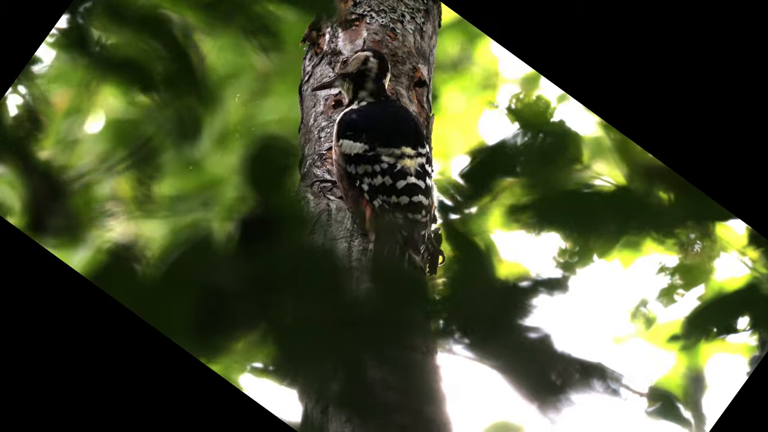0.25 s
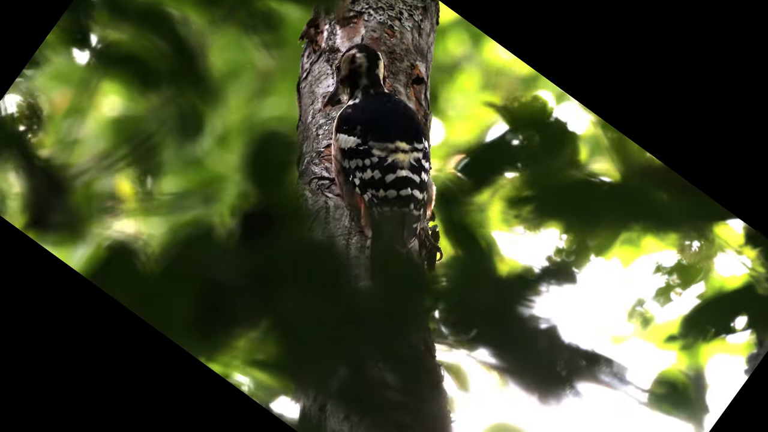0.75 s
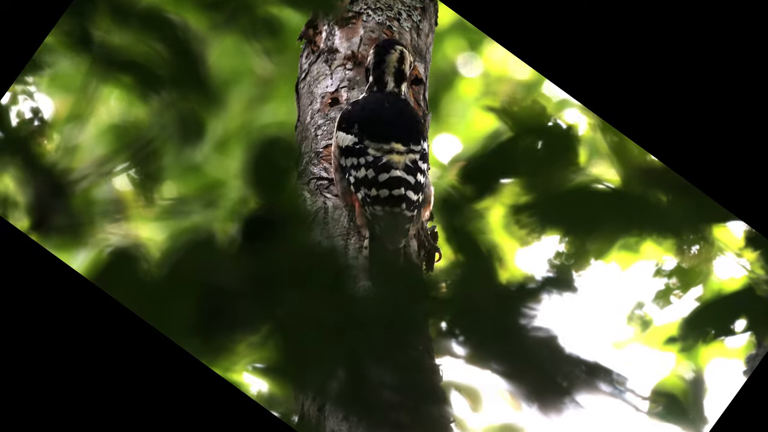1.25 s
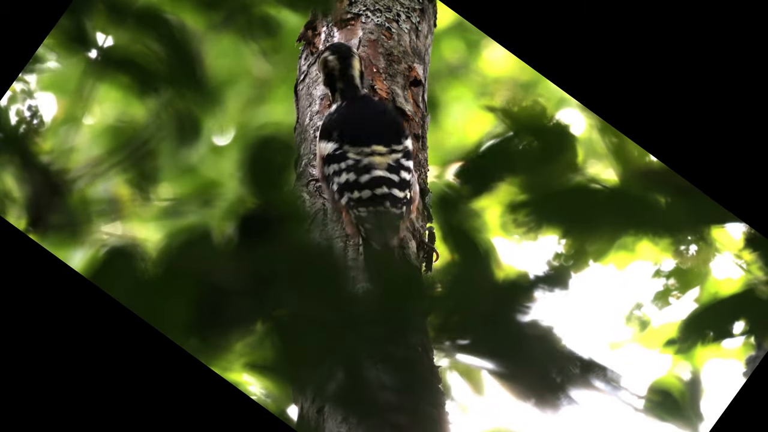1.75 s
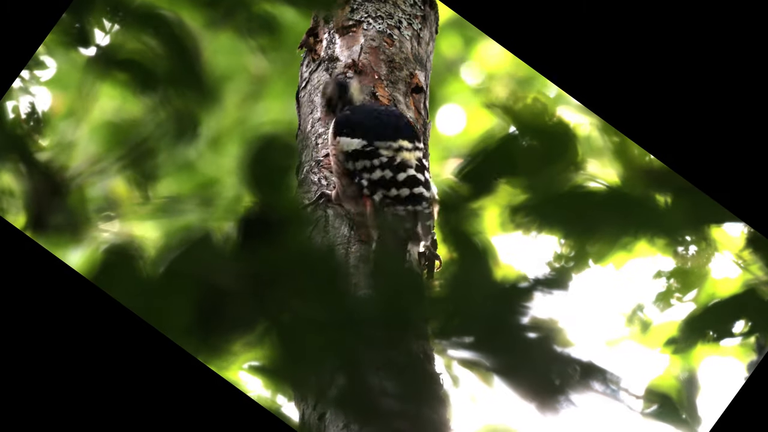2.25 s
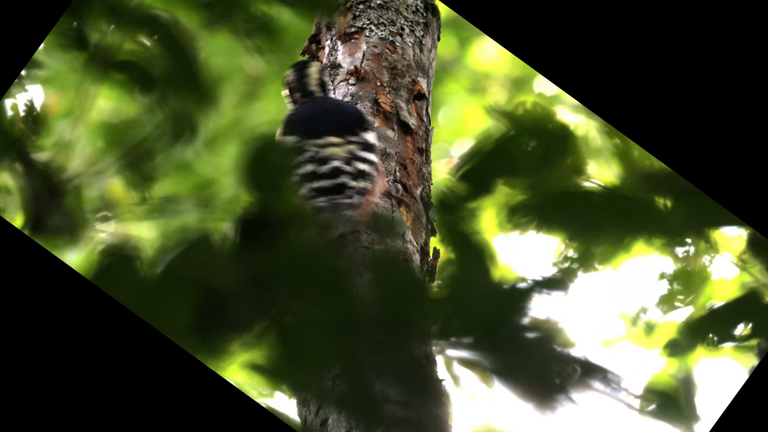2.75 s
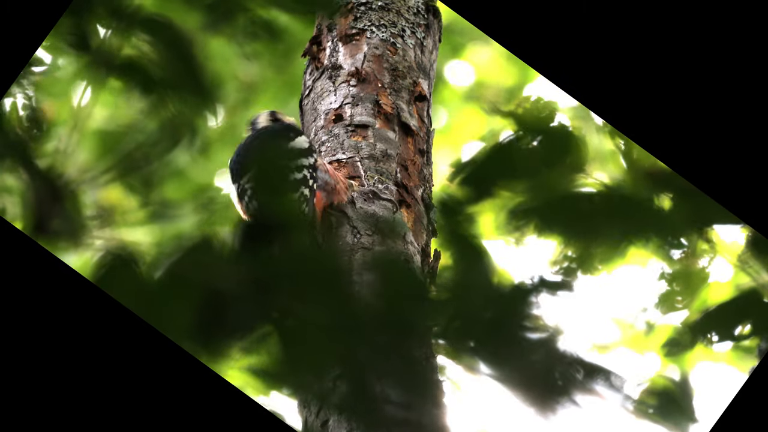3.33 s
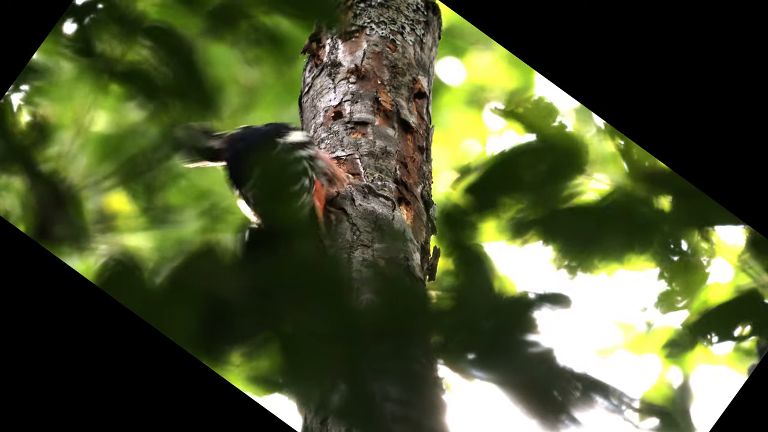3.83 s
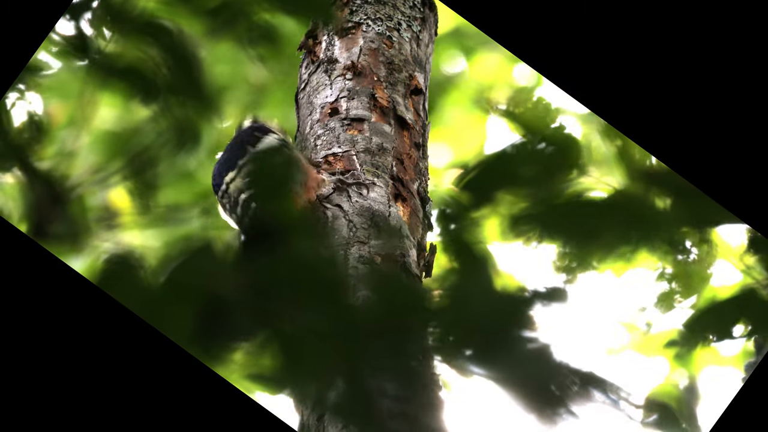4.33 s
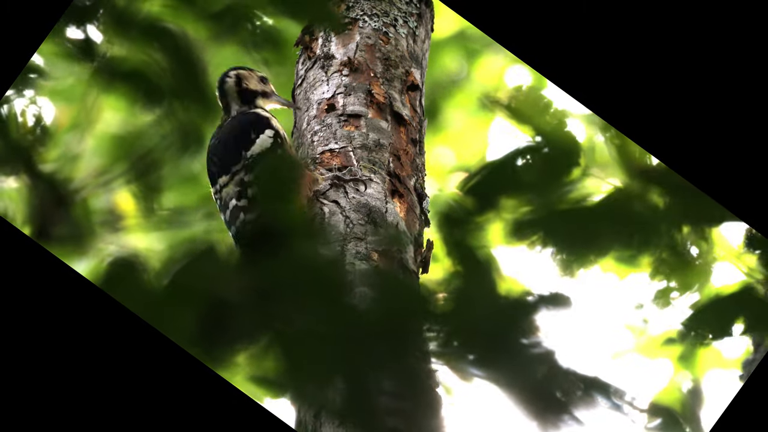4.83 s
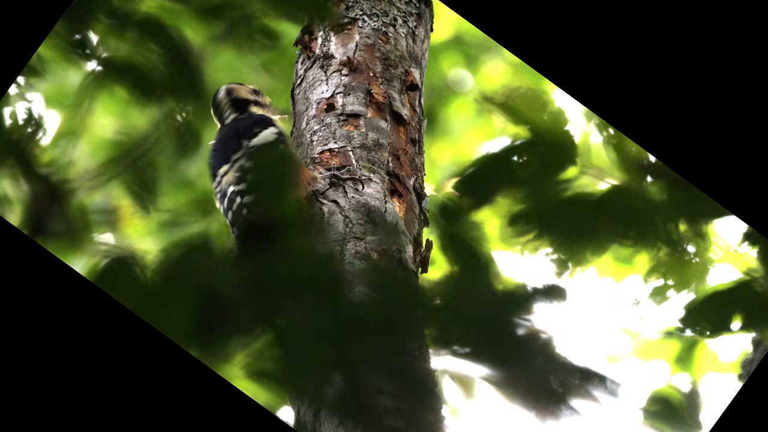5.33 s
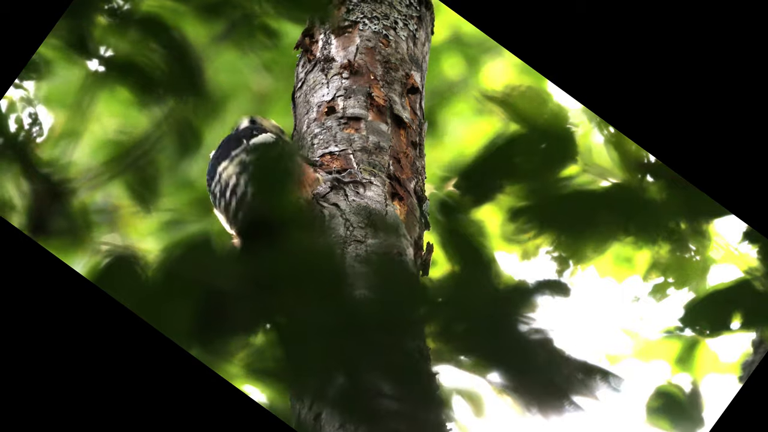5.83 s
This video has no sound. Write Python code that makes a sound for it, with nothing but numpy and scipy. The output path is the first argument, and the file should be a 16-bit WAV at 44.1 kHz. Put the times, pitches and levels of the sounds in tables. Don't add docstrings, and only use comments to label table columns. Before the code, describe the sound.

A woodpecker knocks on a slim trunk in uneven dull thuds, softer at first, then louder and higher, over low forest rumble.

```python
import sys
import numpy as np
from scipy import signal
from scipy.fft import rfft, irfft
from scipy.io import wavfile
from scipy.ndimage import uniform_filter1d

SR = 44100
rng = np.random.default_rng(int(sys.argv[2]) if len(sys.argv) > 2 else 0)


def voltage_ratio(level):
    return 10 ** (np.asarray(level, float) / 20)


def dump(signal):
    limited = np.clip(np.atleast_2d(signal).T, -1, 1)
    pcm = np.round(limited * 32767).astype(np.int16)
    wavfile.write(sys.argv[1], SR, pcm)


N = 268083

# start_s (crest), level_db, first_return_db, second_return_db, pitch_hz
NEAR_BLOWS = [
    (0.6136, -30, -5.5, -7, 226),
    (0.7719, -33, 3.5, -8.5, 234),
    (1.0218, -29.5, -10, -5.5, 235),
    (1.1937, -30, -4, -6.5, 226),
    (1.5132, -33, 5, -1, 228),
    (1.6843, -27, -9, -5.5, 227),
    (1.974, -33.5, -0.5, -5, 215),
    (2.1532, -28, 1, -4, 236.5),
    (2.3428, -27, -5, -4.5, 227),
    (2.552, -28.0, -4.5, -3, 217),
]
# thud_width_hz, return_pitch_ratio, return_width_hz, rebound_db, delays_s (rebound, returns)
NEAR_WOOD = (96, 0.97, 104, -2.5, (.0156, .0230, .0388))
# pitch_hz, width_hz, level_db, delay_s
NEAR_UPPER = (325, 58, -16, .0016)


def near_face():
    return pecks(NEAR_BLOWS, NEAR_WOOD, NEAR_UPPER, lead=3.1)


# start_s (crest), level_db, first_return_db, second_return_db, pitch_hz
SIDE_BLOWS = [
    (3.284, -23, -11, -13.5, 254),
    (3.4599, -21, -6, -19, 264),
    (3.6644, -19.5, -6.5, -15.5, 263.7),
    (4.0569, -20.5, -8, -19, 264),
    (4.5259, -28.5, -6.5, -6, 248),
    (4.6869, -25.5, -5.5, -22.0, 269),
    (4.9412, -21, -6.5, -15.5, 258.3),
    (5.2954, -18.5, -6, -15, 262),
    (5.5741, -33, -14, -3, 249),
    (5.98, -27, -3, -17, 256),
]
# thud_width_hz, return_pitch_ratio, return_width_hz, rebound_db, delays_s (rebound, returns)
SIDE_WOOD = (155, .93, 98, -14.5, (.0148, .0211, .0430))
# pitch_hz, width_hz, level_db, delay_s
SIDE_UPPER = (322, 52, -18, -.0013)


def side_face():
    return pecks(SIDE_BLOWS, SIDE_WOOD, SIDE_UPPER, lead=-.55)


def pecks(blows, wood, upper, lead):
    width_hz, return_ratio, return_width_hz, rebound_db, delays_s = wood
    upper_hz, upper_width_hz, upper_db, upper_delay_s = upper
    wander_s = rng.normal(0, .0002, (len(blows), 3))
    out = np.zeros(N)
    for (start_s, level_db, first_db, second_db, pitch_hz), slip_s in zip(blows, wander_s):
        at = np.arange(round((start_s - .02) * SR), min(round((start_s + .12) * SR), N))
        t = at / SR - start_s
        blow = thud(t, pitch_hz, width_hz, lead)
        blow += voltage_ratio(upper_db) * thud(t - upper_delay_s, upper_hz, upper_width_hz, 0)
        returns_db = (rebound_db, first_db, second_db)
        for delay_s, return_db in zip(delays_s + slip_s, returns_db):
            echo = thud(t - delay_s, pitch_hz * return_ratio, return_width_hz, lead)
            blow += voltage_ratio(return_db) * echo
        out[at] += voltage_ratio(level_db) * blow
    return out


def thud(since_crest_s, pitch_hz, width_hz, lead):
    age = np.maximum(np.pi * width_hz * since_crest_s + 3, 0)
    swell = (age / 3) ** 3 * np.exp(3 - age)
    return swell * np.cos(2 * np.pi * pitch_hz * since_crest_s - lead)


def without_bass(blows):
    gentle = signal.butter(4, 150, "high", fs=SR, output="sos")
    steep = signal.butter(6, 150, "high", fs=SR, output="sos")
    return signal.sosfiltfilt(steep, signal.sosfilt(gentle, blows + 1e-18))


# start_s, peak_db
TICKS = [
    (5.9838, -63),
]


def ticks():
    out, t = np.zeros(N), np.arange(300) / SR
    ring = np.sin(2 * np.pi * 9800 * t) * np.exp(-t / .0015)
    for start_s, peak_db in TICKS:
        out[round(start_s * SR):][:300] = voltage_ratio(peak_db) * ring
    return out


# freq_hz, density_db_per_hz
RUMBLE_COLOUR = [(100, -55), (120, -46.5), (142, -21), (160, -25), (185, -13.5), (208, -14.5), (225, -4),
                 (243, 1), (262, -2.5), (285, -9), (330, -14.5), (400, -21.5), (470, -35), (560, -56)]
# centre_s, rise_db
SWELLS = [(0.16, 2), (0.24, 2.5), (0.44, 1.5), (0.62, 2), (0.8, 2.5), (0.97, 1.5), (1.3, 3.5), (1.97, 3.5),
          (3.2, 1.5), (4.12, 1), (4.35, 4), (4.55, -4), (4.67, 2.5), (4.88, 2.5), (5.33, 4), (5.62, 2),
          (5.75, -3), (5.87, 2)]


def rumble():
    level_db, swell_half_s = -45.3, .045
    noise = coloured(RUMBLE_COLOUR)
    power = uniform_filter1d(noise ** 2, size=1500)
    noise = noise / (1 + .15 * power) ** .5
    centre_s, rise_db = np.transpose(SWELLS)
    return voltage_ratio(level_db + bumps(centre_s, rise_db, [swell_half_s])) * noise


# freq_hz, density_db_per_hz
LEAF_COLOUR = [(400, -5.5), (500, -3), (700, 0.5), (850, -3.5), (1150, -13), (1520, -3.5), (2100, -17),
               (2770, -10.5), (3200, -16.5), (3800, -16.5), (4700, -22), (5800, -15.5), (6800, -25),
               (8400, -31)]
# freq_hz, density_db_per_hz
HISS_COLOUR = [(6000, -33), (7500, -4), (8500, -5), (10000, -0.5), (12500, 2), (15500, 2), (17000, -1)]
# centre_s, leaves_rise_db, hiss_rise_db
STIRS = [
    (0.15, .3, 1.5),
    (1.6, 1.2, 2.5),
    (1.98, 2, 0.3),
    (2.57, 1, .5),
    (3.29, 1, 1),
    (4.05, 1, 0),
    (6.04, 1.3, .5),
]


def leaves_and_hiss():
    leaves_level_db, hiss_level_db, stir_half_s = -63.6, -74, .03
    centre_s, leaves_rise_db, hiss_rise_db = np.transpose(STIRS)
    leaves_db = leaves_level_db + bumps(centre_s, leaves_rise_db, [stir_half_s])
    hiss_db = hiss_level_db + bumps(centre_s, hiss_rise_db, [stir_half_s])
    return voltage_ratio(leaves_db) * coloured(LEAF_COLOUR) + voltage_ratio(hiss_db) * coloured(HISS_COLOUR)


# freq_hz, density_db_per_hz
WIND_COLOUR = [(12, -22), (25, -1), (35, 5.5), (48, 0), (62, -20.5), (100, -22)]
# centre_s, rise_db (over calm), half_length_s
GUSTS = [(0.15, -8, .12), (1.11, 7, .06), (1.33, 15, .04), (1.79, 15, .035), (2.08, 9, .06), (2.39, 11, .1),
         (2.75, 10, .05), (2.87, 16, .06), (3.16, 15, .1), (3.35, 11, .07), (3.54, 19, .09), (3.9, 6, .12),
         (4.15, 6, .12), (4.42, 9, .08), (4.7, 16, .07), (4.92, 8, .05), (5.13, 9, .09), (5.49, 10, .1),
         (5.82, 7, .05), (5.97, 15, .08)]


def wind():
    calm_db = -89
    return voltage_ratio(calm_db + bumps(*np.transpose(GUSTS))) * coloured(WIND_COLOUR)


# freq_hz, density_db_per_hz
HUM_COLOUR = [(45, -8), (65, -1), (100, 4), (125, -4)]


def hum():
    level_db = -90
    return voltage_ratio(level_db) * coloured(HUM_COLOUR)


def coloured(colour):
    freq_hz, density_db = np.transpose(colour)
    log_hz = np.log(np.arange(N // 2 + 1) * SR / N + 1)
    gain = voltage_ratio(np.interp(log_hz, np.log(freq_hz), density_db, left=-120, right=-120))
    noise = irfft(rfft(rng.standard_normal(N)) * gain, N)
    return noise / noise.std()


def bumps(centre_s, rise_db, half_s):
    t = np.arange(0, N + 63, 64) / SR
    bells = np.exp(-((t - np.c_[centre_s]) / np.c_[half_s]) ** 2)
    level_db = np.sum(np.c_[rise_db] * bells, axis=0)
    return np.interp(np.arange(N) / SR, t, level_db)


def scene():
    bird = without_bass(near_face() + side_face()) + ticks()
    air = rumble() + leaves_and_hiss() + wind() + hum()
    return (bird + air)[None]


def roll_off(x):
    return signal.sosfilt(signal.butter(12, 15900, fs=SR, output="sos"), x)


def record(dry):
    start_s, cutoff_hz = .0725, 15750
    top_cut = signal.cheby2(16, 60, cutoff_hz + 350, fs=SR, output="sos")
    sound = signal.sosfilt(top_cut, dry)
    early_s = start_s - np.arange(N) / SR
    no_bass = signal.butter(2, 500, "high", fs=SR, output="sos")
    lead_in = voltage_ratio(-22 - 2200 * early_s) * signal.sosfilt(no_bass, sound)
    mix = np.where(early_s > 0, lead_in, sound)
    return roll_off(mix)


dry = scene()
out = record(dry)
dump(out)
```